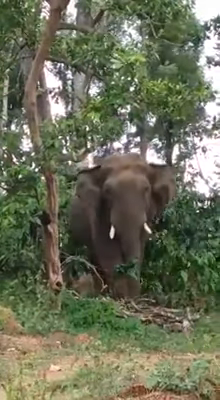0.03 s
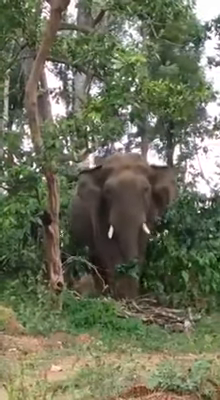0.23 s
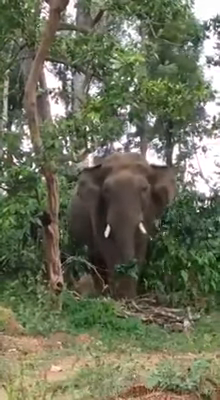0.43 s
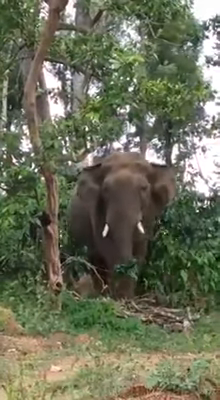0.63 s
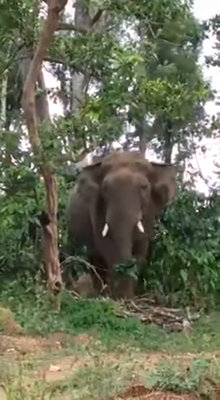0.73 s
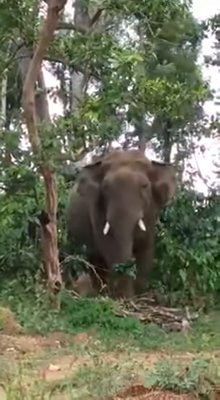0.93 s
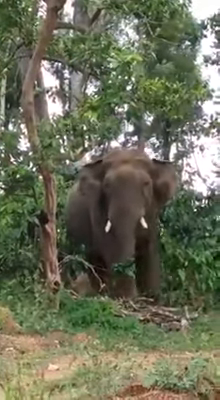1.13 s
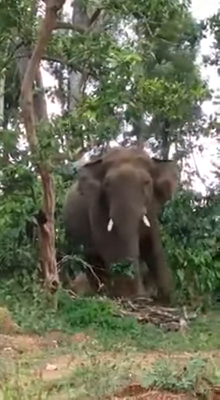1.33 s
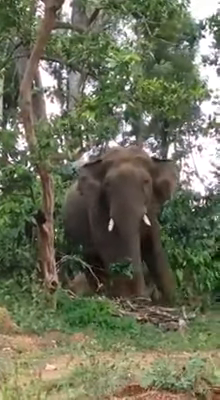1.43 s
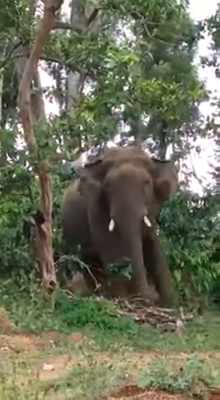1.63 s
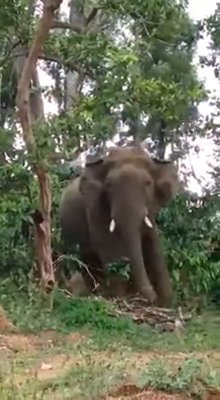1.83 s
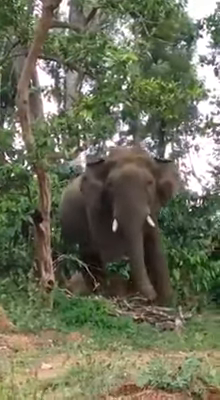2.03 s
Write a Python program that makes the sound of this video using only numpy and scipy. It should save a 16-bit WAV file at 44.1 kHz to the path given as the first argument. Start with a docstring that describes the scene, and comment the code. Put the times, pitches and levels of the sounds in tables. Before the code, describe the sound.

Foliage rustling over light wind, with one long sweep, small snaps and faint twig crunches.

```python
"""Leaves stir softly over a light rumble of wind, swell into one long sweep, then brush faintly a few times.
The place is a wood, with a faint low drone and outdoor hiss behind, mostly right of the microphone pair.
Each rustle is a dense shower of tiny leaf contacts: dull body, rasping middle and crisp treble, coloured
by reflections from close by. Leaves flick and stems snap within the sweep; twigs crunch twice after it."""
import sys
import numpy as np
from scipy import signal
from scipy.fft import rfft, irfft, next_fast_len
from scipy.io import wavfile
from scipy.ndimage import map_coordinates

SR = 44100
rng = np.random.default_rng(int(sys.argv[2]) if len(sys.argv) > 2 else 0)


def file_out(sig):
    """Save sig as 16-bit WAV at sys.argv[1]."""
    # one column per channel
    cols = np.atleast_2d(sig).T
    # limit, then scale
    lim = np.clip(cols, -1, 1)
    pcm = np.round(lim * 32767).astype(np.int16)
    wavfile.write(sys.argv[1], SR, pcm)


N = 92610

# course of the rustle: t/s, rasp level/dB, treble level/dB
RUSTLE_LEVELS = [(0.0, -62, -64), (0.02, -60, -61), (0.13, -63, -64.5), (0.25, -58, -60.5), (0.3, -53, -54),
                 (0.33, -50.5, -50.5), (0.39, -50.5, -53), (0.47, -46, -49), (0.53, -45, -46.5),
                 (0.61, -46.5, -46.5), (0.7, -46, -49.5), (0.74, -46, -47), (0.77, -47.5, -48.5),
                 (0.795, -47.5, -44), (0.88, -54, -53.5), (0.94, -55, -54.5), (1.06, -67.5, -65.5),
                 (1.22, -69.5, -67), (1.32, -65, -63.5), (1.36, -69, -66.5), (1.495, -70, -69.5),
                 (1.52, -75.5, -76), (1.63, -80, -76.5), (1.68, -75, -68.5), (1.74, -77.5, -74.5),
                 (1.81, -78, -76), (1.93, -63.5, -64.5), (1.98, -62, -61.5), (2.02, -68.5, -67.5),
                 (2.1, -75.5, -76.5)]
# the rustle's dull body: t/s, level/dB before its trim
BODY_LEVELS = [(0.0, -71.5), (0.03, -68), (0.09, -72), (0.5, -59), (0.82, -59), (0.85, -63.5),
               (0.95, -64.5), (1.02, -72.5), (1.24, -76.5), (1.32, -74.5), (1.34, -73.5), (1.49, -75.5),
               (1.52, -81), (1.66, -84), (1.96, -71), (2.1, -78.5)]
# where the leaves move: t/s, gain/dB added on the right and taken from the left
LEAF_LEAN = [(0, -0.3), (.33, 0.54), (.6, 0.6), (.85, 0.07), (1.6, -.5), (2.0, 0)]
# the rasp's broad resonance: t/s, lift/dB
RESONANCE_LIFT = [(0, 1.5), (.3, -1.5), (.55, -.5), (.68, 1.5), (.85, -0.5), (1.3, -1), (1.5, -1),
                  (1.97, 0.5)]
# colour of a firm sweep and of a light touch: f/Hz, relative level/dB
FIRM_SPECTRUM = [(180, -13), (300, -6.5), (397, -20.5), (452, -6.5), (499, -14.5), (639, -9.5), (753, -14),
                 (1230, -12), (2190, -3), (3100, -2), (4300, -3.5), (4670, -8.5), (7910, -6), (8580, -9.5),
                 (9790, -5.5), (11400, -11), (12100, -19), (13400, -14), (15300, -26.5)]
SOFT_SPECTRUM = [(180, -41), (300, -3), (468, -5.5), (525, -6), (570, -6), (791, -6.5), (1160, -7.5),
                 (2420, -3), (3100, -2.5), (6280, -3.5), (9320, -1), (13800, -15), (15300, -22)]
# one distinct near reflection: left gain, right gain
REFLECTION_GAINS = [-0.081, 0.28]
# course of the wind and of the drone under it: t/s, level/dB before trims
WIND_LEVELS = [(0, -70.5), (.2, -69), (.4, -66), (.53, -63), (.7, -62), (.8, -64.5), (.87, -62.5),
               (.98, -68), (1.06, -75.5), (1.48, -74), (1.51, -83), (1.72, -84), (1.76, -73), (2.1, -80.5)]
DRONE_LEVELS = [(0, -77), (.44, -80), (.54, -72), (.88, -67), (1.1, -78.5), (1.65, -81), (2.1, -80.5)]
# the drone's tones: f/Hz, relative level/dB
DRONE_TONES = [(53.8, -1), (125, -2.5)]
# colour of the wind and of the wood's hiss: f/Hz, relative level/dB
WIND_SPECTRUM = [(20, -5), (38, -17), (48, -14), (58, -6), (70, -5.5), (90, -3.5), (125, -4), (170, -1.5),
                 (250, -13.5), (400, -35), (900, -36)]
AIR_SPECTRUM = [(59, -41), (100, 0.5), (299, 0), (361, -37), (445, -2), (1250, -22), (1360, -11),
                (5680, -16.5), (15300, -19)]
# leaf flicks and twig crunches: t/s, envelope level/dB, decay/s
LEAF_FLICKS = [(.308, -44, 0.016), (.468, -44.5, 0.035), (.594, -40, 0.025), (.781, -39, 0.015)]
TWIG_CRUNCHES = [(1.296, -60.5, 0.04), (1.484, -69, 0.0091)]
# single snaps of stems: t/s, peak level/dB
STEM_SNAPS = [(.3272, -37), (.416, -34), (0.4872, -30), (0.4912, -32), (0.5827, -28), (0.629, -34),
              (.8011, -35)]
# colour of a flick, a snap and a crunch: f/Hz, relative level/dB
FLICK_SPECTRUM = [(300, -42), (2000, -14), (4500, -6), (7500, 13.5), (10500, 7), (12000, -18), (15000, 1)]
SNAP_SPECTRUM = [(300, -27), (1200, -11), (2800, 1), (5000, -6), (10000, 0), (15000, -31)]
CRUNCH_SPECTRUM = [(300, -10), (800, -11), (1100, 8), (2200, -1), (5500, -1), (10000, 0), (15000, -26)]
# likeness of the two microphone channels: f/Hz, likeness from 0 to 1
MIC_LIKENESS = [(100, 1), (400, 0.94), (1000, 0.76), (1400, 0.9), (3000, 0.77), (5000, 0.43), (8000, 0.34),
                (14000, 0.2)]
# balance at the microphones: f/Hz, left minus right level/dB
MIC_BALANCE = [(100, -3.5), (800, -4), (1300, -4.5), (2100, -4.5), (3000, -4.5), (4000, 0.6), (5500, -1.5),
               (8000, -0.5), (9300, -9), (11300, -8), (12100, -8), (13500, -9.5), (15000, -10.5)]


def amp(db):
    """Decibels to gain."""
    return 10 ** (np.asarray(db) / 20)


def unit(pair):
    """A stereo pair scaled so that its middle has rms 1."""
    return pair / np.sqrt(np.mean(pair.mean(axis=0) ** 2) + 1e-20)


def along(points, hz):
    """Rows of f/Hz and a value, read on a log frequency axis."""
    knots_hz, values = np.transpose(points)
    return np.interp(np.log(hz + 1), np.log(knots_hz + 1), values)


def curves(rows):
    """One value per sample for each column after the time."""
    times, *columns = np.transpose(rows)
    return [np.interp(np.arange(N) / SR, times, column) for column in columns]


def wobble(rate):
    """A smooth random curve, rate knots a second."""
    knots = rng.standard_normal(int(N * rate / SR) + 4)
    return map_coordinates(knots, [np.arange(N) * rate / SR])


def filtered(x, response):
    """x shaped by a gain that depends on frequency."""
    size = next_fast_len(N + SR // 2)
    return irfft(rfft(x, size) * response(np.fft.rfftfreq(size, 1 / SR)), size)[..., :N]


def placed(pair, spectrum):
    """Two unrelated signals, coloured and blended to sit right of centre at the microphones."""
    def mid_side_gains(hz):
        angle = np.arccos(np.clip(along(MIC_LIKENESS, hz), 0, 1)) / 2
        return amp(along(spectrum, hz)) * [np.cos(angle), np.sin(angle)]

    mid, side = filtered(pair, mid_side_gains)
    left_right = np.array([mid + side, mid - side])
    return filtered(left_right, lambda hz: amp(np.outer([.5, -.5], along(MIC_BALANCE, hz))))


def contacts(per_s=5000, spread_db=2, slide_db=2):
    """Tiny leaf ticks, mostly weak and a few strong, on the noise of leaves sliding."""
    happens = rng.random((2, N)) < per_s / SR
    size = amp(spread_db * np.minimum(rng.exponential(size=(2, N)), 3.5))
    ticks = happens * size * np.sign(rng.standard_normal((2, N)))
    sliding = rng.standard_normal((2, N))
    return unit(ticks) + amp(slide_db) * unit(sliding)


def reflected(pair, scatter_db=-2, scatter_s=0.013, echo_s=0.01855, low_hz=900, high_hz=6500):
    """Nearby surfaces add a short scatter, different at each microphone, and one distinct echo."""
    t = np.arange(SR // 20) / SR
    decay = np.exp(-t / scatter_s)
    tail = rng.standard_normal((2, len(t))) * decay * (1 - decay)
    tail *= amp(scatter_db) / np.linalg.norm(tail, axis=1, keepdims=True)
    tail[:, round(echo_s * SR)] += REFLECTION_GAINS
    reflections = signal.fftconvolve(pair, tail, axes=1)[:, :N]
    band = lambda hz: hz ** 2 / (hz ** 2 + low_hz ** 2) / np.sqrt(1 + (hz / high_hz) ** 2)
    return pair + filtered(reflections, band)


def leaf_bands(spectrum, low_hz=220, rasp_from_hz=1320, treble_from_hz=4620):
    """The contacts heard through the leaves: body, rasp and treble, each of rms 1."""
    sound = reflected(placed(contacts(), spectrum))
    sound = filtered(sound, lambda hz: hz ** 4 / (hz ** 4 + low_hz ** 4))
    body = filtered(sound, lambda hz: 1 / (1 + (hz / rasp_from_hz) ** 20))
    below_treble = filtered(sound, lambda hz: 1 / (1 + (hz / treble_from_hz) ** 20))
    return unit(body), unit(below_treble - body), unit(sound - below_treble)


def patchy(pair, depth_db, patch_hz=170, patch_s=0.074):
    """The rustle's colour flickers at random, in small patches of time and frequency."""
    frame, hop = 1024, 512
    spectra = signal.stft(pair, nperseg=frame)[2]
    across = np.hanning(3 + int(2 * patch_hz * frame / SR))
    during = np.hanning(3 + int(2 * patch_s * SR / hop))
    patches = signal.fftconvolve(rng.standard_normal(spectra.shape[1:]), np.outer(across, during), "same")
    gain = amp(depth_db * patches / patches.std())
    return signal.istft(spectra * gain, nperseg=frame)[1][:, :N]


def resonant(rasp, centre_hz=2870, width_hz=850):
    """The rasp with its broad resonance lifted or lowered."""
    lift_db, = curves(RESONANCE_LIFT)
    core = filtered(rasp, lambda hz: 1 / (1 + (2 * (hz - centre_hz) / width_hz) ** 4))
    return rasp + (amp(lift_db) - 1) * core


def foliage(soft_db=-70, firm_db=-52, body_trim_db=-0.5):
    """Leaves brush past each other; a firm sweep rasps more than a light touch."""
    rasp_db, treble_db = curves(RUSTLE_LEVELS)
    body_db, = curves(BODY_LEVELS)
    lean_db, = curves(LEAF_LEAN)
    firmness = np.clip((rasp_db - soft_db) / (firm_db - soft_db), 0, 1)
    sound = np.zeros((2, N))
    for spectrum, share in (FIRM_SPECTRUM, firmness), (SOFT_SPECTRUM, 1 - firmness):
        body, rasp, treble = leaf_bands(spectrum)
        body = amp(body_db + body_trim_db) * body
        rasp = amp(rasp_db) * resonant(unit(patchy(rasp, depth_db=1.7)))
        treble = amp(treble_db) * unit(patchy(treble, depth_db=1.02))
        sound += np.sqrt(share) * (body + rasp + treble)
    return sound * amp(np.outer([-1, 1], lean_db))


def wind(trim_db=0.5):
    """Light wind: a low rumble that swells with the long sweep."""
    level_db, = curves(WIND_LEVELS)
    rumble = placed(rng.standard_normal((2, N)), WIND_SPECTRUM)
    return amp(level_db + trim_db) * unit(rumble)


def drone(waver_db=1.0, drift_rad=0.35, lean_db=2.3):
    """Two faint low tones that waver in level and pitch, right of centre."""
    level_db, = curves(DRONE_LEVELS)
    t = np.arange(N) / SR
    tones = np.zeros(N)
    for hz, db in DRONE_TONES:
        gain = amp(db + waver_db * wobble(7.03))
        tones += gain * np.sin(2 * np.pi * hz * t + drift_rad * wobble(5.46))
    return np.sqrt(2) * amp(level_db) * tones * amp([[-lean_db], [lean_db]])


def air(level_db=-79, left_trim_db=1, right_trim_db=-1):
    """The faint steady hiss of the wood."""
    hiss = placed(rng.standard_normal((2, N)), AIR_SPECTRUM)
    return amp(level_db) * unit(hiss * amp([[left_trim_db], [right_trim_db]]))


def bursts(rows, spectrum, attack_s):
    """Quick clusters of contacts that swell and die away."""
    t = np.arange(N) / SR
    envelope = np.zeros(N)
    for start_s, db, decay_s in rows:
        age = np.maximum(t - start_s, 0)
        envelope += amp(db) * (1 - np.exp(-age / attack_s)) * np.exp(-age / decay_s)
    return envelope * unit(placed(contacts(), spectrum))


def leaf_flicks():
    """Leaves flick within the sweep, each a crisp burst of contacts."""
    return bursts(LEAF_FLICKS, FLICK_SPECTRUM, attack_s=0.01)


def stem_snaps():
    """A few stems snap, each one sharp click to the right of the microphones."""
    clicks = np.zeros((2, N))
    for start_s, db in STEM_SNAPS:
        clicks[0, round(start_s * SR)] = amp(db)
    sound = placed(clicks, SNAP_SPECTRUM)
    mid_peak = np.abs(sound.mean(axis=0)).max()
    return sound * clicks.max() / mid_peak


def twig_crunches():
    """Twigs crunch after the sweep, each an abrupt burst of contacts."""
    return bursts(TWIG_CRUNCHES, CRUNCH_SPECTRUM, attack_s=0.0026)


def scene():
    """The wood as it reaches the microphones."""
    return foliage() + wind() + drone() + air() + leaf_flicks() + stem_snaps() + twig_crunches()


def record(dry):
    """The recorder keeps nothing above its band limit."""
    return filtered(dry, lambda hz: hz < 15450)


dry = scene()
out = record(dry)
file_out(out)
```